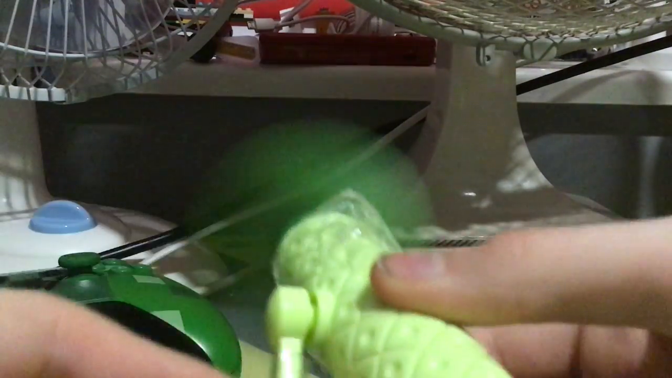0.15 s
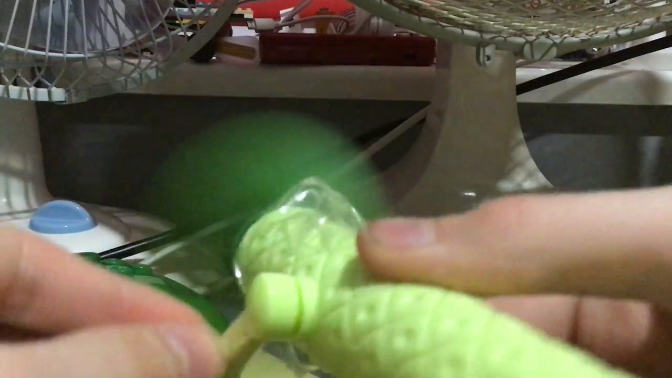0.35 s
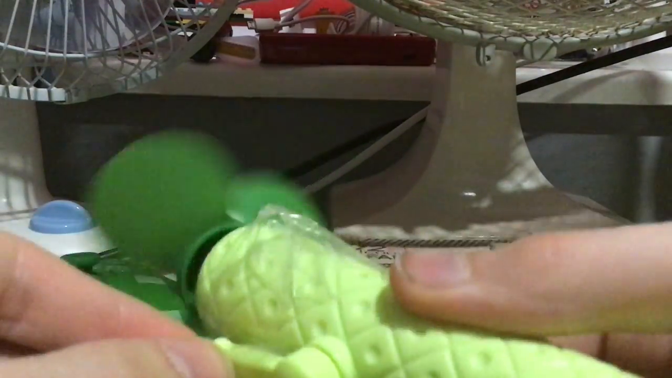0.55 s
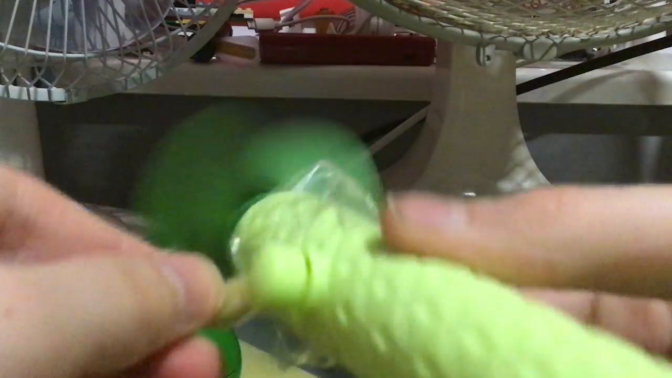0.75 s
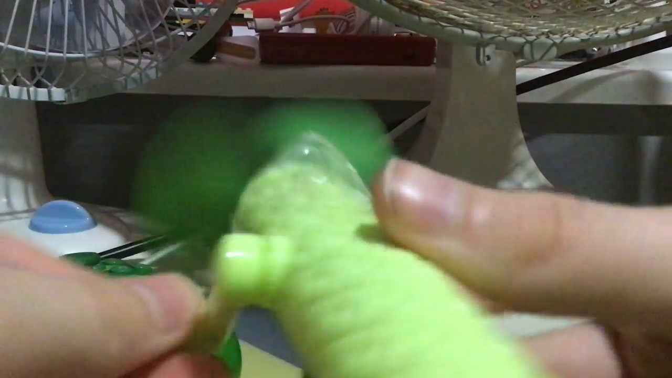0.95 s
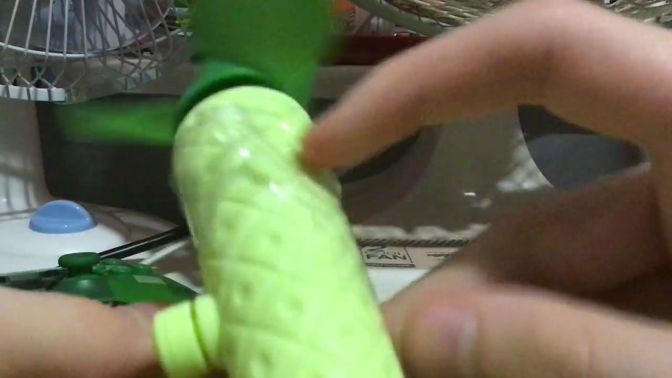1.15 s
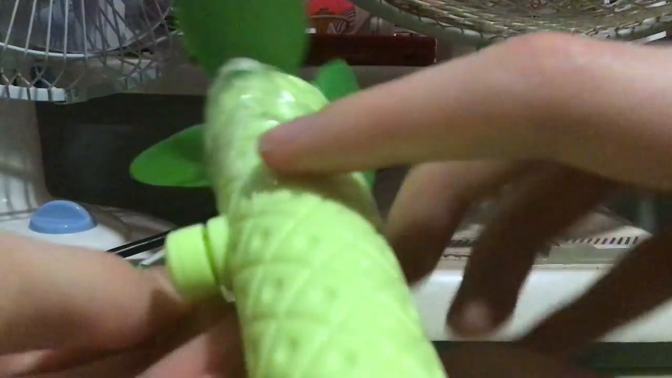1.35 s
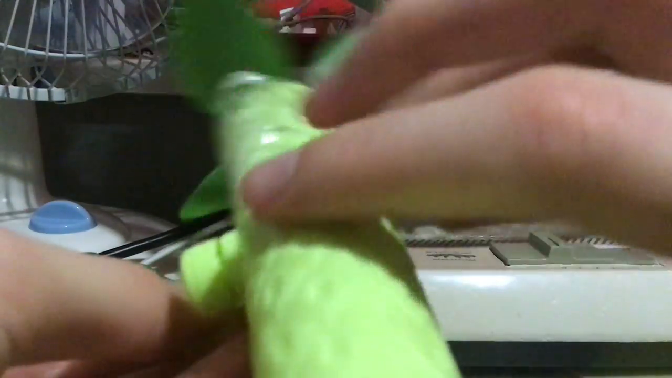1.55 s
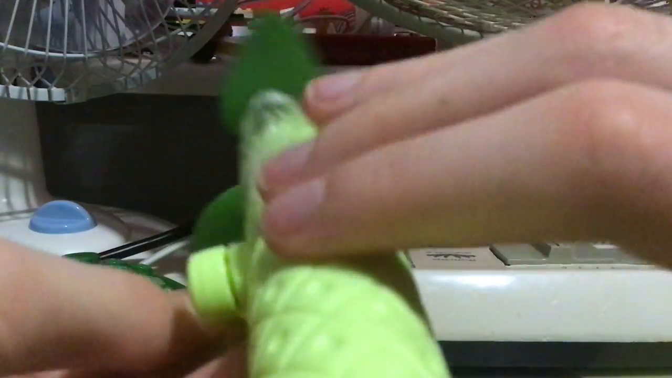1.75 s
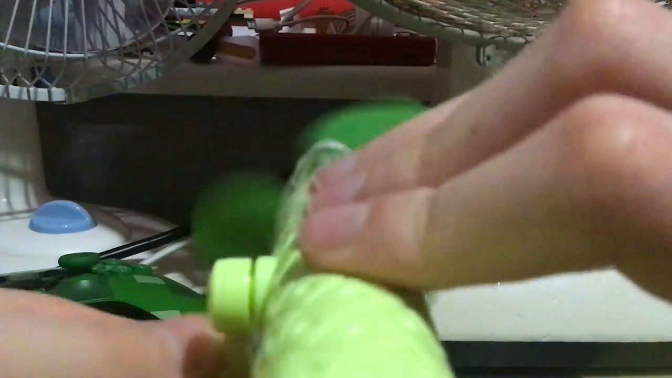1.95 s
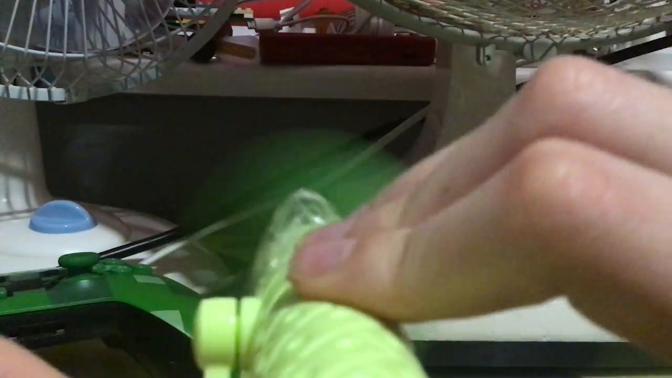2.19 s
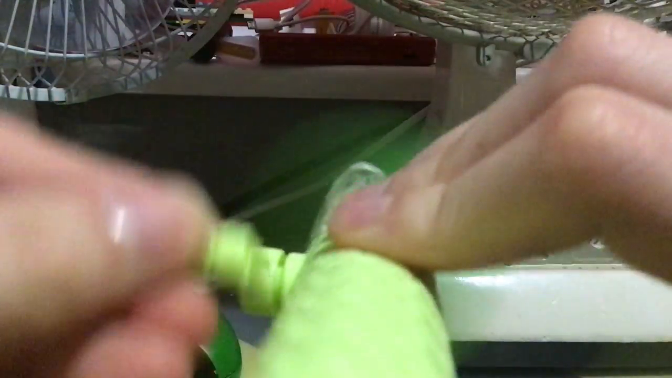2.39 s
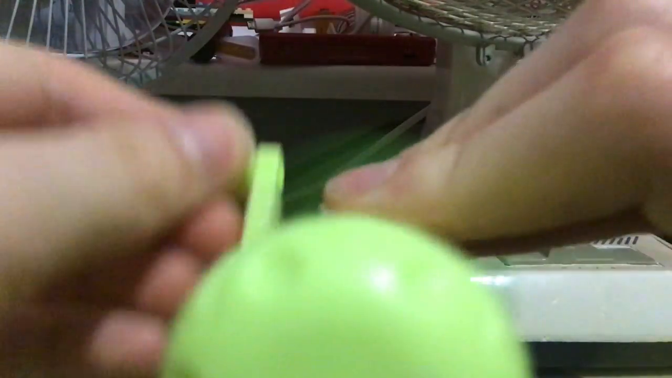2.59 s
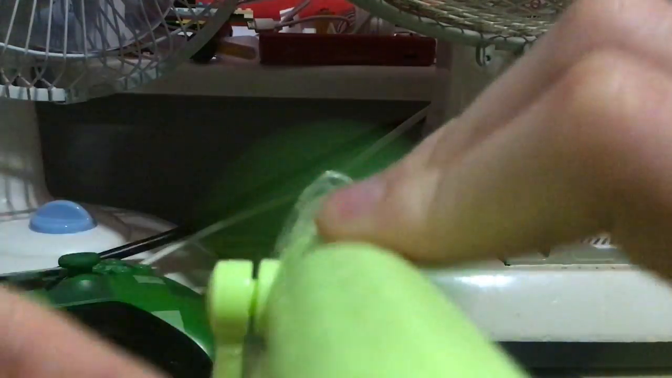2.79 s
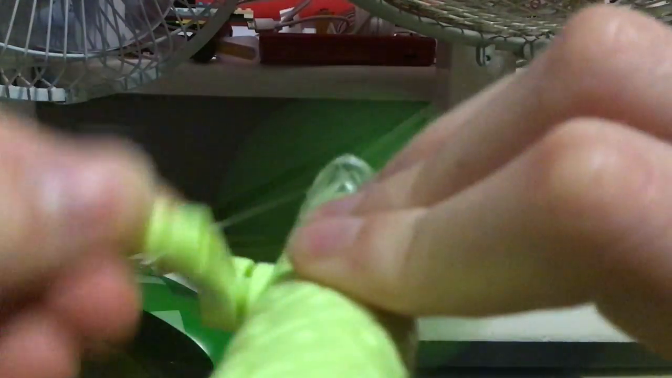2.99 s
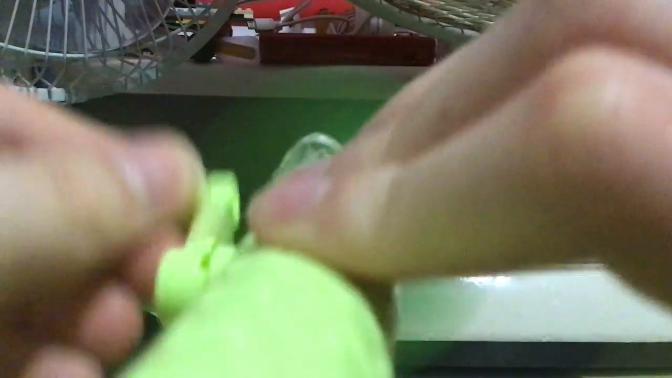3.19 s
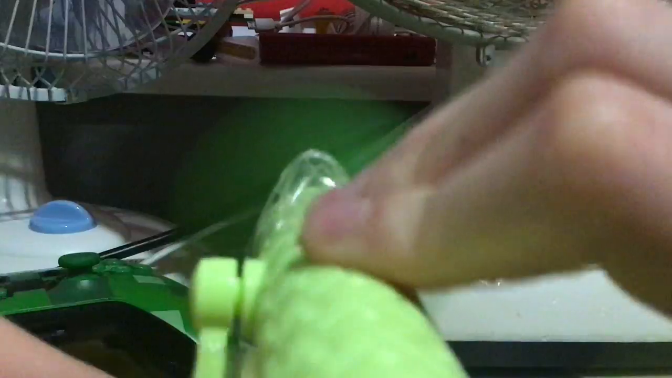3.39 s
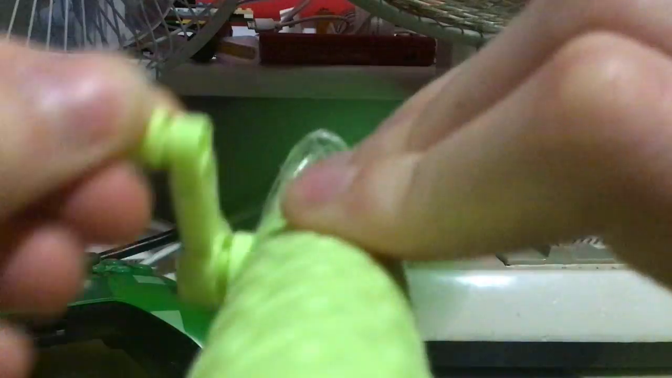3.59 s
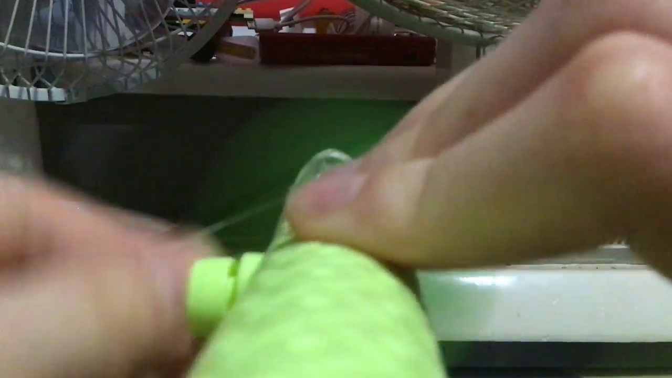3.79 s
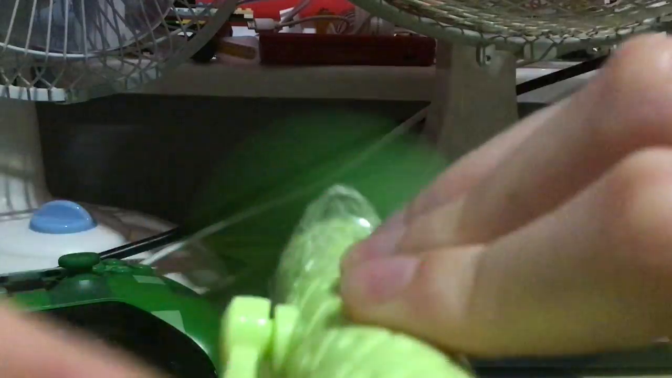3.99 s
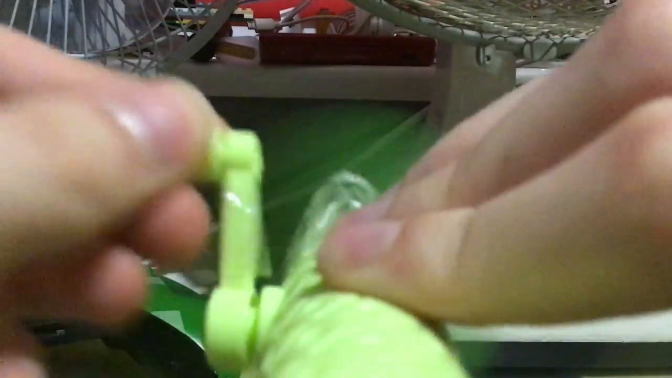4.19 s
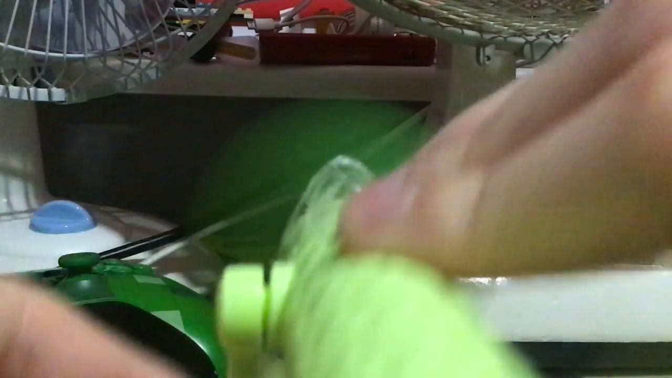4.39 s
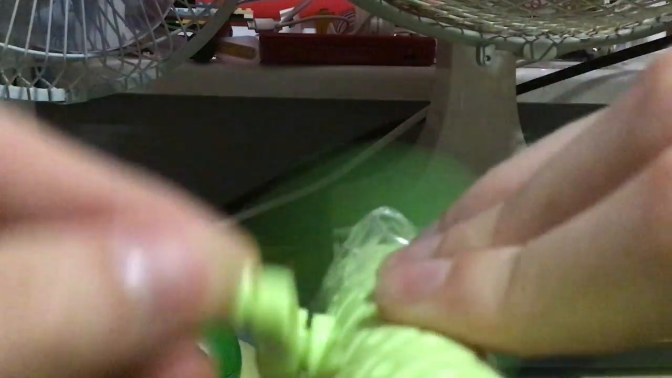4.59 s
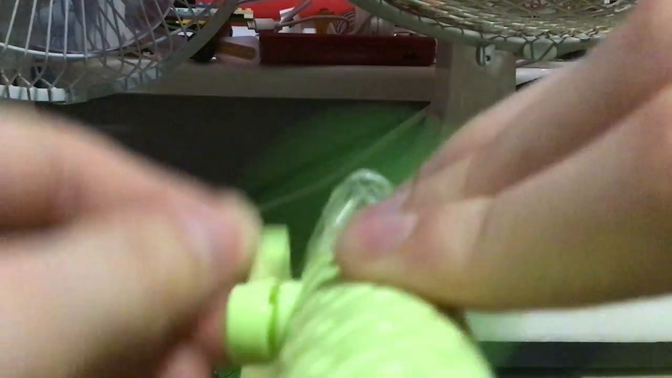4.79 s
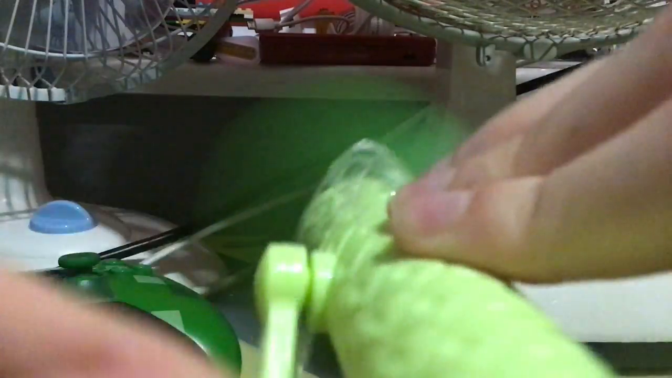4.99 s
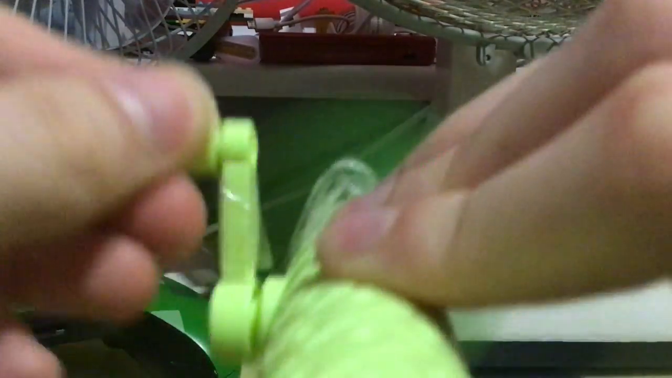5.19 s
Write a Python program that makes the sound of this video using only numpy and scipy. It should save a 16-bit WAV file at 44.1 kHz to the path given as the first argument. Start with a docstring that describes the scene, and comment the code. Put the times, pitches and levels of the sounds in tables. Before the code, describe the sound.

Close to a small microphone in a quiet room, a hand-cranked plastic fan coasts down with rapid ratchety rattles and a sinking hum. Fingers then rustle and click on its taped handle. From about two seconds the crank turns, gears grind in a bright fast whirr, and air thumps the microphone.

```python
"""A hand-cranked plastic fan close to a small microphone in a quiet room, whose noise lasts throughout.
First the fan coasts to a stop: catching gear teeth excite the hollow shell, with a hum and a last draught.
Then fingers shift on the taped handle: filtered noise makes rustle, ticks, a low bump and slides.
A faint steady tone passes, then the fan is cranked: click trains of two geared shafts excite the shell,
meshing teeth sing, and eddies buffet the microphone port as shaped noise and short damped swings."""
import sys
import numpy as np
from scipy import signal
from scipy.fft import rfft, irfft
from scipy.io import wavfile
from scipy.ndimage import uniform_filter1d

SR = 44100
rng = np.random.default_rng(int(sys.argv[2]) if len(sys.argv) > 2 else 0)


def store_pcm(level_fs):
    """Save levels as 16-bit WAV."""
    pcm = np.round(np.clip(level_fs, -1, 1) * 32767).astype(np.int16)
    wavfile.write(sys.argv[1], SR, np.atleast_2d(pcm).T)


N = 231525
T = np.arange(N) / SR   # time of each sample, s

# Modes of the hollow body: f/Hz, width/Hz, level/dB turned aside, level/dB turned to the microphone
BODY_MODES = [(588, 216, -10.5, -11.5), (1188, 255, -6.5, -6.5), (1638, 390, -0.5, -8),
              (2117, 280, -10, -8.5), (2590, 230, -27, -11.5), (3225, 1110, -1, -4.5), (3630, 730, 2, -4.5),
              (4390, 230, -4, -7.5), (5130, 240, -1, -8.5), (6550, 2800, -8, -10), (7130, 1940, -14, -23),
              (9500, 420, -17.5, -12), (11850, 350, -47, -45), (12380, 2700, -31, -20),
              (14700, 3200, -40, -25), (15000, 270, -31, -24)]
DULL_TOP_HZ = 2700      # modes below this are driven by the dull contacts

# Coasting, the off-centre gear catches once a turn: t/s, sharp drive level/dB, dull drive level/dB,
# tooth spacing/s
CATCHES = [(-0.0265, -27.5, -30, 0.0086), (0.035, -27, -30, 0.012), (0.0979, -28, -32.5, 0.0096),
           (0.154, -26, -30.5, 0.01), (0.2226, -26.5, -30.5, 0.01), (0.289, -28, -30.5, 0.0097),
           (0.351, -24.5, -34, 0.01), (0.4171, -28, -36.5, .0088), (0.459, -40.5, -43, 0.014),
           (0.515, -53.5, -63, 0.015)]
# Each tooth of a catch: level/dB against its catch
CATCH_TEETH_DB = [-1.5, -1, -4, -0.5, -8]
# hiss against the sharp drive and against the dull drive
CATCH_HISS_DB, CATCH_DULL_HISS_DB, CATCH_HISS_T60_S = -16, -9, 0.097
# Coasting hum, pitch of the fundamental: t/s, f/Hz
HUM_PITCH = [(0.0, 138), (0.15, 140), (0.4, 121), (0.55, 86)]
# Partials of the hum: multiple of the fundamental, level/dB before the upper ones follow the pitch
HUM_PARTIALS = [(1, -4), (2, -7.5), (5, -2)]
HUM_DB = -70.5

# Draught spectrum, relative density before the port's low cut: f/Hz, level/dB per Hz
DRAUGHT_SPECTRUM = [(15, -41), (25, -26), (59, 4), (108, 0.5), (165, -3), (224, -2.5), (397, -16.5),
                    (479, -25.5), (600, -29), (780, -80), (1320, -120)]
# Rumble of the draught on the port, before the low cut: t/s, level/dB
GUSTS = [(2.2, -65.5), (2.45, -55), (2.55, -41), (2.79, -29.5), (2.93, -55), (2.96, -41), (3.03, -50.5),
         (3.06, -33), (3.12, -42), (3.2, -35.5), (3.27, -43.5), (3.4, -37), (3.5, -49), (3.53, -40),
         (3.56, -44.5), (3.77, -36), (3.95, -43.5), (4.11, -34.5), (4.17, -39.5), (4.4, -32.5), (4.46, -48),
         (4.59, -40.5), (4.61, -43.5), (4.65, -38), (5.04, -42), (5.25, -37)]
# Single eddies that slap the port, before the low cut: t/s, peak level/dB, f/Hz, edge level/dB
SLAPS = [(2.536, -33, 115, -48), (2.583, -28, 187, -52), (2.65, -25, 123, -38.5), (2.688, -25, 140, -36.5),
         (2.732, -24.5, 199, -30), (2.771, -28, 127, -31.5), (2.809, -25.5, 102, -30.5),
         (2.865, -30.5, 167, -57), (2.962, -35, 122, -45.5), (3.046, -34, 105, -38.5),
         (3.086, -44, 113, -44), (3.136, -28.5, 123, -44), (3.184, -25.5, 119, -49),
         (3.225, -33, 115, -41.5), (3.314, -31.5, 133, -45), (3.375, -23, 111, -68),
         (3.673, -33, 107, -35.5), (3.735, -23, 151, -34.5), (3.831, -29, 220, -34),
         (3.858, -29.5, 117, -54), (4.044, -35, 182, -61), (4.083, -32, 172, -50),
         (4.114, -27.5, 210, -32.5), (4.144, -31.5, 213, -42), (4.218, -31, 193, -37),
         (4.275, -46, 148, -38), (4.315, -31.5, 177, -54), (4.367, -25, 173, -39), (4.485, -31.5, 106, -52),
         (4.643, -23.5, 174, -34), (4.765, -28, 153, -40), (4.796, -26.5, 145, -39),
         (4.851, -32.5, 240, -38), (4.907, -31, 110.4, -40.5), (5.071, -29, 215, -44),
         (5.132, -29, 157, -48), (5.192, -26.5, 121, -49)]
EDGE_DB, EDGE_FOLLOWS = -50.5, 1.21     # edge at a rumble of -37.5 dB; dB of edge per dB of rumble
COAST_AIR_DB, COAST_AIR_FADE_S = -75, 0.13      # last draught of the slowing blades

# Room noise spectrum, relative density: f/Hz, level/dB per Hz
ROOM_SPECTRUM = [(20, -46), (60, -4), (120, -0.5), (220, -4), (350, -6.5), (500, -14), (750, -14),
                 (1100, -27), (3600, -23.5), (9000, -28.5), (16000, -32.5)]
ROOM_DB = -74.5
ECHO_T60_S, ECHO_DB = 0.23, -12.5

# Tape and skin rustle: t/s, level/dB
RUSTLE_LEVEL = [(0.58, -93), (0.75, -72.5), (0.904, -66.5), (1.05, -73.5), (1.416, -87), (1.526, -87),
                (1.662, -88), (1.882, -92), (2.16, -75)]
RUSTLE_HZ = 4600
# Fingers, tape and crank handle: t/s, peak level/dB, f/Hz, treble peak level/dB, t60/s
TICKS = [(0.6649, -68, 3600, -80, 0.008), (0.7331, -45.5, 2830, -59, 0.0023),
         (0.7586, -54, 3400, -75, 0.0064), (0.7677, -54, 3600, -69, 0.0087),
         (0.7885, -45.5, 3070, -80, 0.018), (0.8417, -61, 3180, -75, 0.008), (0.86, -58, 5730, -70, 0.007),
         (0.871, -48, 5600, -82, 0.0079), (0.943, -51, 3470, -82, 0.0097), (0.9044, -63, 5600, -78, 0.0074),
         (0.9522, -56, 5290, -71, 0.009), (0.9953, -46, 3630, -64, 0.048), (1.0127, -46, 5730, -64, 0.021),
         (1.021, -47, 5600, -45, 0.011), (1.03, -34.5, 5550, -31, 0.019), (1.13, -59, 4760, -60, 0.019),
         (1.143, -48, 7900, -74, 0.015), (1.1872, -41.5, 3330, -62, 0.035), (1.2177, -51, 4520, -57, 0.027),
         (1.2308, -46.5, 2030, -72, 0.021), (1.262, -50.5, 6300, -58, 0.023),
         (1.3671, -51.5, 6460, -48, 0.018), (1.4627, -52, 6440, -50, 0.013),
         (1.484, -41.5, 7040, -37, 0.014), (1.5616, -65, 5040, -54, 0.011),
         (1.5719, -46, 4030, -79, 0.0085), (1.643, -44, 4800, -51, 0.0038), (1.8527, -45, 4040, -73, 0.013),
         (1.921, -45, 6640, -57, 0.0067), (1.9385, -34.5, 4700, -77, 0.0063),
         (2.04, -50.5, 5160, -79, 0.013), (2.0804, -28.5, 6300, -50, 0.0053),
         (2.135, -40, 7950, -71, 0.0055), (2.1538, -45.5, 4280, -91, 0.0083),
         (2.169, -62, 3950, -54.5, 0.0091), (2.1988, -45.5, 4150, -72, 0.013),
         (2.2345, -42, 4000, -76, 0.029), (2.265, -38.5, 4200, -55, 0.0061)]
# Soft low bumps of the hand: t/s, peak level/dB, f/Hz, t60/s
BUMPS = [(1.222, -49, 228, 0.016)]
# A fingertip slides on the tape: t/s, level/dB before the attack, t60/s
SLIDES = [(1.35, -75.5, 0.47), (1.635, -74, 0.23)]
SLIDE_ATTACK_S = 0.013
TONE_FROM_S, TONE_TO_S, TONE_FADE_S, TONE_HZ, TONE_DB = 1.67, 1.86, 0.1, 540, -83.5

# Cranking, slack and push of each crank turn: t/s, blade shaft rate/(turns per s)
SHAFT_SPEED = [(2.15, 18.9), (2.25, 18.16), (2.462, 20.1), (2.485, 20.09), (2.774, 28.48), (2.789, 29.12),
               (3.177, 26.11), (3.364, 28.44), (3.603, 24.95), (3.907, 30.7), (4.142, 27.36),
               (4.431, 31.69), (4.594, 26.76), (4.917, 32.23), (5.173, 29.43), (5.25, 30.02)]
# Cranking, common level of the gears: t/s, level/dB before the hand's sweep
GEAR_LEVEL = [(2.1, -67.5), (2.27, -52.5), (2.5, -49), (2.9, -46.5), (3.3, -46), (3.7, -46), (4.0, -45),
              (4.4, -45), (5.25, -45)]
# Contacts in each turn of the blade shaft: share of the turn, sharp level/dB, dull level/dB
SHAFT_CONTACTS = [(.03, -11, -3), (.145, 2, 0), (.34, -6, -14), (.5, -12, -4), (.645, 1, -2), (.71, -7, -7),
                  (.85, -7, -14), (.91, -10, -12)]
# Contacts in each turn of the slower gear: share of the turn, sharp level/dB, dull level/dB
GEAR_CONTACTS = [(0.028, -22, -8.5), (0.108, -14, -7), (0.238, -14.5, -14.5), (.35, -12, -21),
                 (.39, -13, 2), (.53, -11, -0.5), (.63, -10, -3), (.82, -21, 4.5), (.92, -11, -6)]
# Tooth meshing tones: multiple of the shaft rate, level/dB before speed and load act
MESH_TONES = [(20, -15), (24, -21.5)]
GEAR_RATIO = 5 / 7      # slower gear turns per blade shaft turn
TEETH, SHAFT_TURNS_PER_CRANK = 20, 15
TREBLE_HZ = 6000        # corner of the swept treble lift
# The cranking hand sweeps past the shell once a crank turn: mean, swing, share of the turn at the peak
SWEEP_HZ = (4130, 110, .36)                 # main resonance, f/Hz
SWEEP_MAIN_DB = (4, 1.5, 0.34)       # strength of the main resonance, level/dB
SWEEP_LEVEL_DB = (-0.26, 0.5, .25)     # whole gear sound, level/dB
SWEEP_TREBLE_DB = (-1, .9, .85)   # treble lift, level/dB

CUTOFF_HZ = 15800


def from_db(db):
    """Amplitude ratio of a level in dB."""
    return 10 ** (np.asarray(db) / 20)


def rms_one(x):
    """Normalisation to unit rms."""
    return x / np.sqrt(np.mean(x ** 2) + 1e-20)


def in_time(rows):
    """Linear interpolation of each column of a curve, one value per sample."""
    s, *columns = np.transpose(rows)
    return [np.interp(T, s, c) for c in columns]


def smoothly(rows):
    """Interpolation by half cosines, so that the curve eases from point to point."""
    s, value = np.transpose(rows)
    place = np.interp(T, s, np.arange(len(s)))
    whole = np.floor(place)
    eased = whole + (1 - np.cos(np.pi * (place - whole))) / 2
    return np.interp(eased, np.arange(len(s)), value)


def sounding(rows, fade=0.018):
    """Gate: one while a curve lasts, with linear fades of `fade` seconds outside."""
    start, end = rows[0][0], rows[-1][0]
    return np.interp(T, [start - fade, start, end, end + fade], [0, 1, 1, 0])


def drift(rate):
    """Random modulation of unit rms: noise through a double real pole at `rate` Hz."""
    r = np.exp(-2 * np.pi * rate / SR)
    return rms_one(signal.lfilter([1], [1, -2 * r, r * r], rng.standard_normal(N + SR))[SR:])


def resonator(hz, width):
    """Second-order resonance with unit gain at its peak: filter coefficients."""
    r = np.exp(-np.pi * width / SR)
    zeros = np.array([1, 0, -1]) * (1 - r * r) / 2
    return zeros, [1, -2 * r * np.cos(2 * np.pi * hz / SR), r * r]


def resonate(x, hz, width):
    """Response of one fixed resonance."""
    return signal.lfilter(*resonator(hz, width), x)


def bending(x, hz, width):
    """Response of a resonance whose centre moves, block by block."""
    out, state = np.zeros(N), np.zeros(2)
    for i in range(0, N, 256):
        zeros, poles = resonator(hz[i], width)
        out[i:i + 256], state = signal.lfilter(zeros, poles, x[i:i + 256], zi=state)
    return out


def coloured(spectrum):
    """Noise of unit rms, shaped by a spectral density."""
    hz, db = np.transpose(spectrum)
    grid = np.arange(N // 2 + 1) * SR / N + 1
    gain = from_db(np.interp(np.log(grid), np.log(hz), db))
    return rms_one(irfft(rfft(rng.standard_normal(N)) * gain, N))


def bursts(clicks, t60):
    """Exponential decay: each click becomes an envelope that jumps up and dies."""
    return signal.lfilter([1], [1, -from_db(-60 / (t60 * SR))], clicks + 1e-18)


def swing(hz, t, cycles, fall):
    """Damped oscillation that swells, dies and sinks in pitch if `fall` is positive; peak near 1."""
    shape = hz * t / cycles * np.exp(1 - hz * t / cycles)
    return shape * np.sin(2 * np.pi * hz * t / (1 + fall * hz * t))


def knock(clicks, t60, hard_db):
    """Impact: the surfaces scuff, the blow lands a moment later, chatter dies away."""
    scuff = bursts(clicks, t60) - bursts(clicks, t60 / 3)
    blow = np.roll(clicks, SR // 1000) * rng.choice([-1, 1], N)
    return from_db(hard_db) * blow + scuff * rng.standard_normal(N)


def body(sharp, dull, axis, sway_db=.7):
    """Modal sum: dull contacts drive low modes, sharp ones high; each sways as the grip shifts."""
    out = np.zeros(N)
    for k, mode in enumerate(BODY_MODES):
        hz, width = mode[:2]
        gain = (-1) ** k * from_db(mode[axis] + sway_db * drift(2.1))
        out += gain * resonate(dull if hz < DULL_TOP_HZ else sharp, hz, width)
    return out


def catches():
    """Impulsive drive: sharp and dull click trains of the catching teeth, and their hiss envelopes."""
    s, sharp_db, dull_db, spacing = np.transpose(CATCHES)[:, :, None]
    early = SR // 10    # lead-in, as the first catch is already under way
    at = ((s + spacing * np.arange(len(CATCH_TEETH_DB))) * SR).astype(int) + early
    db = np.array([sharp_db, dull_db]) + CATCH_TEETH_DB
    clicks, rub = np.zeros((2, 2, N + early))
    clicks[:, at] = from_db(db + 2.0 * rng.standard_normal(db.shape))
    rub[:, at] = from_db(db)
    hiss_gain = from_db([[CATCH_HISS_DB], [CATCH_DULL_HISS_DB]])
    return clicks[:, early:], bursts(rub, CATCH_HISS_T60_S)[:, early:] * hiss_gain


def coasting():
    """Free run-down: loose gears excite the shell modes, with a harmonic hum."""
    clicks, rub = catches()
    flicker = from_db(2 * drift(150))
    hiss = rub * flicker * rng.standard_normal(N)
    sharp = knock(clicks[0], t60=0.024, hard_db=-3) + hiss[0]
    dull = knock(clicks[1], t60=0.031, hard_db=5.0) + hiss[1]
    rattle = body(sharp, dull, axis=2)
    hz, = in_time(HUM_PITCH)
    phase = 2 * np.pi * (np.cumsum(hz) / SR + 0.0084 * drift(43))
    hum = np.zeros(N)
    for k, db in HUM_PARTIALS:
        follow = (hz / 140) ** (0.71 * (k - 1))     # upper partials fade first
        hum += from_db(db) * follow * np.sin(k * phase)
    return rattle + np.sqrt(2) * from_db(HUM_DB) * sounding(HUM_PITCH) * hum


def draught():
    """Turbulent pressure on the port: lumpy rumble, a sharper edge in the gusts, single slaps."""
    air = coloured(DRAUGHT_SPECTRUM)
    low = rms_one(signal.sosfilt(signal.butter(4, 180, fs=SR, output="sos"), air))
    edge = rms_one(signal.sosfilt(signal.butter(4, 180, "high", fs=SR, output="sos"), air))
    lumps, flutter, out = drift(28.0), drift(33), np.zeros(N + SR)
    low_db, = in_time(GUSTS)
    edge_db = EDGE_DB + EDGE_FOLLOWS * (low_db + 37.5)
    rumble = from_db(low_db + 1.6 * lumps) * low
    sharp_edge = from_db(edge_db + 4.5 * lumps + 3 * flutter) * edge
    out[:N] = sounding(GUSTS) * (rumble + sharp_edge)
    coast_gain = from_db(COAST_AIR_DB + 1.5 * lumps) * sounding(HUM_PITCH, COAST_AIR_FADE_S)
    out[:N] += coast_gain * (low + edge)
    t = np.arange(SR // 16) / SR
    for (s, db, hz, slap_edge_db), sign in zip(SLAPS, rng.choice([-1, 1], len(SLAPS))):
        slap = from_db(db) * swing(hz, t, cycles=0.67, fall=0.019)
        slap += from_db(slap_edge_db) * swing(451, t, cycles=1.9, fall=0.07)
        out[int(s * SR):][:len(t)] += sign * slap
    return signal.sosfilt(signal.butter(4, 50, "high", fs=SR, output="sos"), out[:N])


def room_noise():
    """Stationary background: noise shaped by the spectrum of the quiet room."""
    return from_db(ROOM_DB) * coloured(ROOM_SPECTRUM)


def echoes(x):
    """Reverberation: table and shelf return a short dense tail, an exponentially decaying noise."""
    t = np.arange(SR // 3) / SR
    tail = rng.standard_normal(len(t)) * from_db(-60 * t / ECHO_T60_S) * (t > .003)
    return x + from_db(ECHO_DB) * signal.fftconvolve(x, tail / np.sqrt(np.sum(tail ** 2)))[:N]


def rustle():
    """Stick-slip creak of tape: many tiny random snaps on a thin hiss, around a wandering centre."""
    rustle_db, = in_time(RUSTLE_LEVEL)
    centre_hz = RUSTLE_HZ * 2 ** (0.31 * drift(7.1))
    snap_db = 6.8 * np.minimum(rng.exponential(1, N), 4)
    snaps = (rng.random(N) < 200 / SR) * from_db(snap_db)   # 200 per second on average
    grains = (bursts(snaps, t60=0.006) + from_db(-9.0)) * rng.standard_normal(N)
    sound = np.zeros(N)
    for k, hz in enumerate(np.geomspace(900, 11000, num=8)):
        nearness = 1 / (1 + np.log2(hz / centre_hz) ** 2)   # distance in octaves
        sound += (-1) ** k * resonate(grains, hz, 0.6 * hz) * nearness / hz ** .5
    return from_db(rustle_db) * sounding(RUSTLE_LEVEL) * rms_one(sound)


def handling():
    """Transient contact: pitched noise puffs with a treble snap, and damped low bumps of the hand."""
    out, length = np.zeros(N + SR), SR // 5
    t = np.arange(length) / SR
    treble = signal.butter(2, [7500, 14000], "band", fs=SR, output="sos")
    for (s, db, hz, treble_db, t60), puff in zip(TICKS, rng.standard_normal((len(TICKS), length))):
        decay = from_db(-60 * t / t60) + from_db(-27 - 60 * t / 0.063)      # snap, then a faint tail
        puff = puff * decay * np.minimum(t / 0.0005, 1)
        pitched = resonate(resonate(puff, hz, 0.42 * hz), hz, 0.89 * hz)
        broad = resonate(resonate(puff, 2350, 7300), 2100, 7200)
        mid = pitched + from_db(-4.5) * broad
        top = signal.sosfilt(treble, puff)
        tick = from_db(db) * mid / np.abs(mid).max() + from_db(treble_db) * top / np.abs(top).max()
        out[int(s * SR):][:length] += tick
    for s, db, hz, t60 in BUMPS:
        bump = swing(hz, t, cycles=hz * t60 / np.log(1000), fall=0)
        out[int(s * SR):][:length] += from_db(db) * bump
    return out[:N]


def slide():
    """Sliding friction: skin on tape hisses in one band, with a quick start and a decay."""
    hiss = rms_one(resonate(resonate(rng.standard_normal(N), 2950, 640), 2950, 810))
    envelope = np.zeros(N)
    for s, db, t60 in SLIDES:
        attack = np.clip((T - s) / SLIDE_ATTACK_S, 0, 1)
        envelope += attack * from_db(db - 60 * np.abs(T - s) / t60)
    return hiss * envelope


def faint_tone():
    """Pure tone: a thin steady sine far in the background."""
    gate = sounding([[TONE_FROM_S], [TONE_TO_S]], TONE_FADE_S)
    return np.sqrt(2) * from_db(TONE_DB) * gate * np.sin(2 * np.pi * TONE_HZ * T)


def contacts(turns, table, scatter_db, jitter):
    """Quasi-periodic impacts: sharp and dull click trains of one shaft, scattered in time and force."""
    whole = np.arange(int(turns[-1]) + 1)[:, None]
    share, sharp_db, dull_db = np.transpose(table)
    chance = rng.standard_normal((3, len(whole), len(share)))
    at = np.searchsorted(turns, whole + share + jitter * chance[0])     # jitter in shares of a turn
    at = np.clip(at, 0, N - 1).ravel()
    dull_chance = 0.84 * chance[1] + 0.15 * chance[2]
    out = np.zeros((2, N))
    np.add.at(out[0], at, from_db(sharp_db + scatter_db * chance[1]).ravel())
    np.add.at(out[1], at, from_db(dull_db + scatter_db * dull_chance).ravel())
    return out


def meshing(speed, turns):
    """Periodic tooth engagement: tones at multiples of the shaft rate, set by speed and load."""
    waver = 0.0057 * drift(5.8)     # turns
    mesh = sum(from_db(db) * np.sin(2 * np.pi * k * (turns + waver)) for k, db in MESH_TONES)
    # teeth sing when the crank pushes, fall quiet when the blades overrun
    load = uniform_filter1d(np.gradient(speed) * SR, size=4000)
    return mesh * (speed / 28) ** 4 * from_db(np.clip(0.11 * load - 3.5, -12, 3))


def cranked():
    """Driven gears: knocks of both shafts over tooth ticks that swell with the off-centre slower gear."""
    speed = smoothly(SHAFT_SPEED)
    turns = np.cumsum(speed * (T >= SHAFT_SPEED[0][0])) / SR

    def sweep(mean, depth, share):
        """Sinusoidal modulation, one period per crank turn."""
        return mean + depth * np.cos(2 * np.pi * (turns / SHAFT_TURNS_PER_CRANK - share))

    gear_db = in_time(GEAR_LEVEL)[0] + sweep(*SWEEP_LEVEL_DB)
    clicks = contacts(turns, SHAFT_CONTACTS, scatter_db=2.5, jitter=.004)
    clicks = clicks + contacts(turns * GEAR_RATIO, GEAR_CONTACTS, scatter_db=2.5, jitter=.006)
    teeth = contacts(turns * TEETH, [(0.0021, 0, 0)], scatter_db=2.5, jitter=.25)[0]
    swell = from_db(2.0 * np.cos(2 * np.pi * (turns * GEAR_RATIO - .2)))
    tooth_ticks = knock(teeth, t60=0.0081, hard_db=8.5)
    hiss = swell * (tooth_ticks + from_db(-7.0) * rng.standard_normal(N))
    sharp = knock(clicks[0], t60=.011, hard_db=11) * np.sqrt(swell) + from_db(-11.5) * hiss
    dull = knock(clicks[1], t60=.012, hard_db=10.5) + from_db(-9.0) * hiss
    dull = dull * (speed / 28) ** 0.09      # low modes wake with speed
    main = from_db(sweep(*SWEEP_MAIN_DB)) * bending(sharp, sweep(*SWEEP_HZ), width=510)
    shell = body(sharp, dull, axis=3) + main
    treble = signal.sosfilt(signal.butter(2, TREBLE_HZ, "high", fs=SR, output="sos"), shell)
    shell = shell + (from_db(sweep(*SWEEP_TREBLE_DB)) - 1) * treble
    gears = from_db(19.5) * shell + meshing(speed, turns)
    return from_db(gear_db) * sounding(GEAR_LEVEL, fade=0.093) * gears


def scene():
    """Superposition: fan and hands excite the room; the draught acts on the microphone directly."""
    near = coasting() + rustle() + handling() + slide() + cranked()
    return (echoes(near) + draught() + room_noise() + faint_tone())[None]


def record(dry):
    """Band limit: a steep elliptic low-pass cuts the top."""
    return signal.sosfilt(signal.ellip(14, .5, 75, CUTOFF_HZ, fs=SR, output="sos"), dry)


dry = scene()
out = record(dry)
store_pcm(out)
```